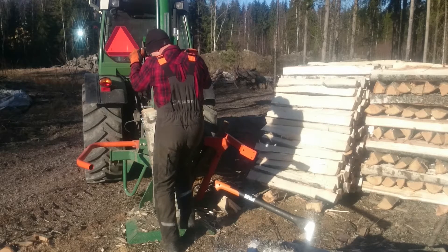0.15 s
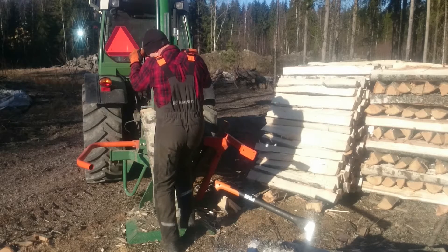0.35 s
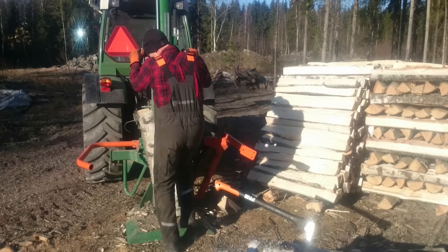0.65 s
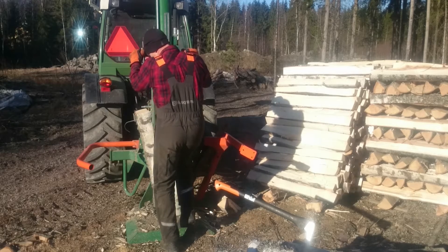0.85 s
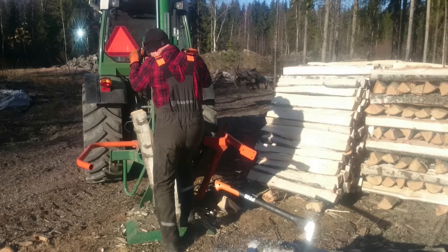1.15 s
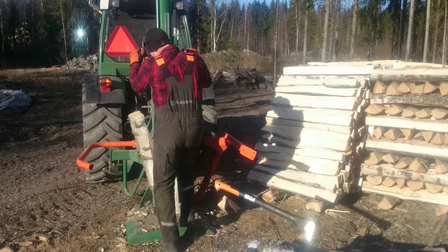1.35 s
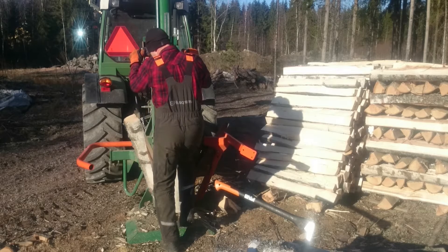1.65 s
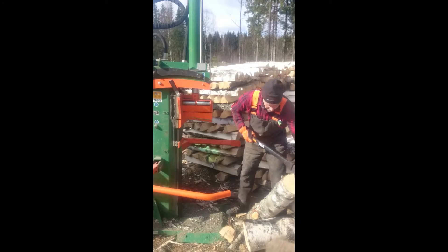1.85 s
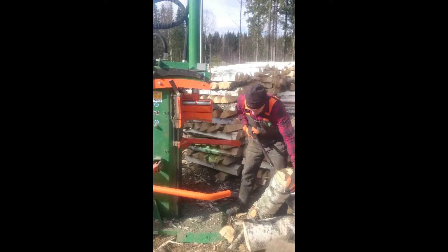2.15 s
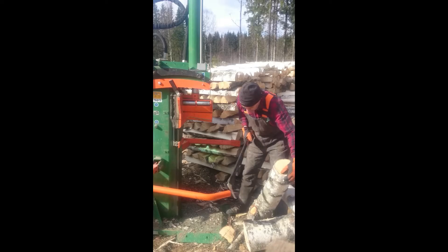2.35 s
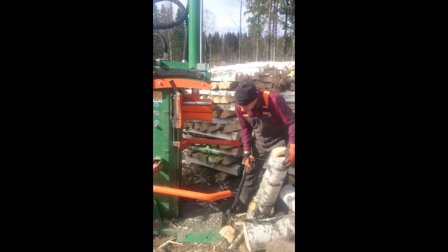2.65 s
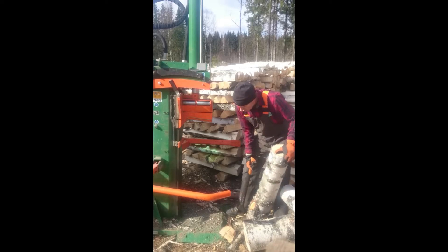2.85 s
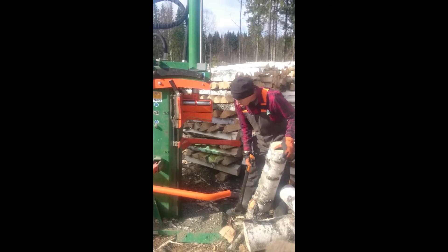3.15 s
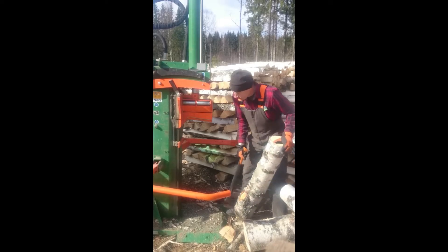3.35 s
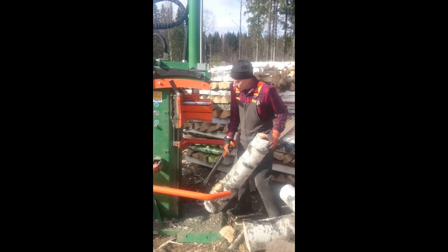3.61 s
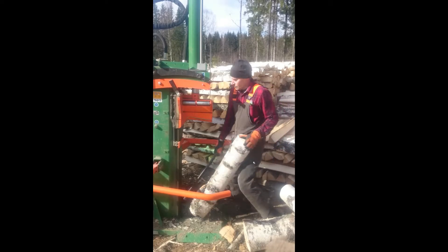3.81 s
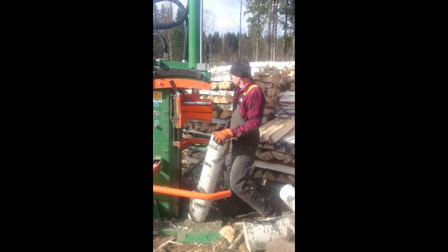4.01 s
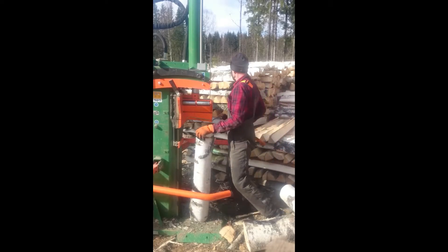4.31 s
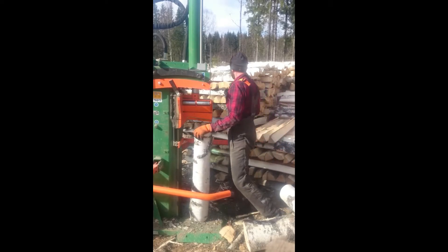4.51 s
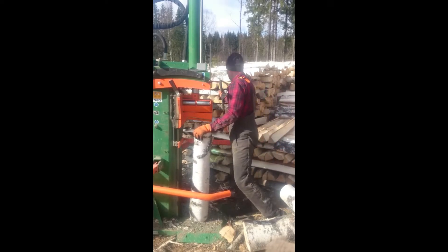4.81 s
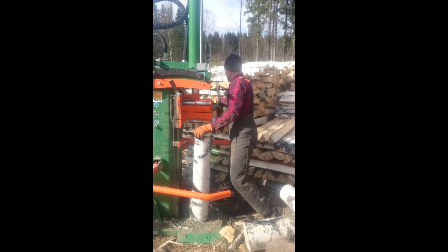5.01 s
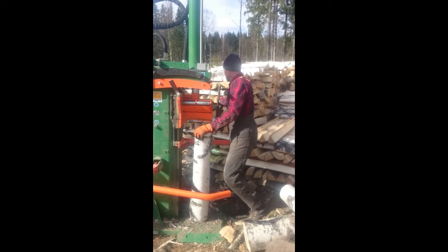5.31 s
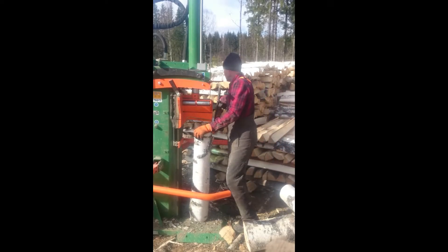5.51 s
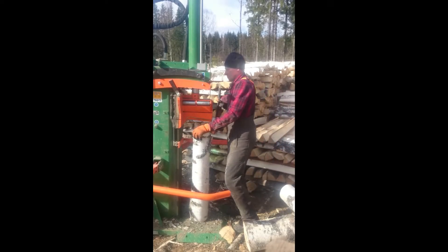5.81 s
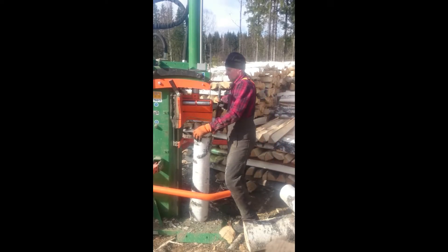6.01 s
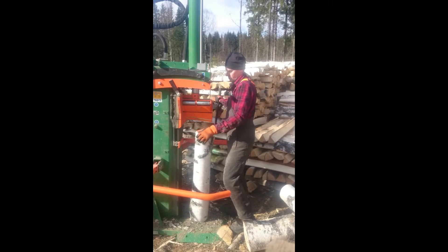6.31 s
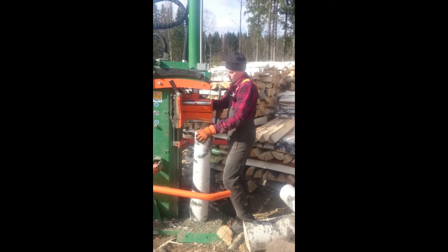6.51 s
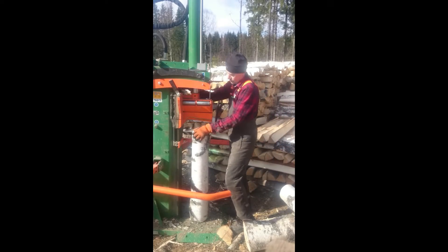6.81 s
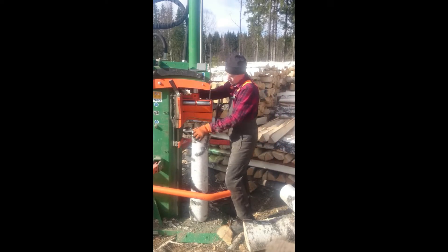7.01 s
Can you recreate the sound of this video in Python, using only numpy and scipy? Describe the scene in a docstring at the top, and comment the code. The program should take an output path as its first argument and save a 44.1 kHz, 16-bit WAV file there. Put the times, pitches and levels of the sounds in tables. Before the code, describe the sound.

Steady rapid diesel chugging runs throughout, rough and clattering. A steel clink opens; then the hydraulic splitter strains, fibres tear and the log breaks in a cluster of knocks and dry snaps. A faint descending bird whistle repeats in the lull. Metal ticks, the engine relaxes, then a second log cracks harder and splinters sparsely. Outdoors, near stereo pickup, with a light scatter from wood stacks and trees.

```python
"""A diesel tractor idles with thud, clatter and rattle; twice it labours as a log splitter's valve opens.
Oil hisses and a birch log tears apart with rips, creaks, knocks and sharp cracks; steel clinks, a bird calls.
Engine sounds follow a count of firings: pulses for the exhaust, shaped noise for the machine, a sine for the pump.
Bursts of tiny breaks excite the resonances of fibres and log; knocks and clinks are sums of dying sine modes.
Dense reflections from woodpiles and forest edge surround everything but the engine."""
import sys
import numpy as np
from scipy import signal
from scipy.fft import rfft, irfft
from scipy.io import wavfile

SR = 44100
rng = np.random.default_rng(int(sys.argv[2]) if len(sys.argv) > 2 else 0)


def inscribe(sig):
    """Save sig as 16-bit PCM at rate SR to the path in sys.argv[1].

    A 1-D sig is mono; a 2-D sig holds one channel per row.
    Samples are clipped to [-1, 1] before scaling.
    """
    pcm = np.round(np.clip(np.atleast_2d(sig).T, -1, 1) * 32767)
    wavfile.write(sys.argv[1], SR, pcm.astype(np.int16))


N = 315756
TIME = np.arange(N) / SR

# strokes of the ram: (valve opens t/s, valve closes t/s, time scale of the log's resistance/s,
# share of full pressure that pushes on through the split log/0-1)
STROKES = [(.6, 2.78, 0.47, 0.5), (4.46, 7.3, 0.092, 0.81)]
IDLE_HZ = 22.988  # firings per second
CONTACT_S = .06  # from the opening of the valve until the wedge meets the log
CLATTER_POWER = .43  # below 1: diesel knock and rattle harden already at light load


def from_db(db):
    """Decibels to gain."""
    return 10 ** (np.asarray(db) / 20)


def rms_one(x):
    """Scale to rms 1."""
    return x / np.sqrt(np.mean(x ** 2) + 1e-20)


def at_hz(points, hz):
    """Read a spectrum on a log-frequency axis."""
    point_hz, value = np.array(points).T
    return np.interp(np.log(hz), np.log(point_hz), value)


def drift(rate):
    """Smooth chance of rms 1 that takes a new direction rate times a second."""
    knots = rng.standard_normal(4096)
    return rms_one(np.interp(TIME * rate, np.arange(len(knots)), knots))


def since(s):
    """Seconds gone by since time s, zero before it."""
    return np.maximum(TIME - s, 0)


def add(track, s, sound):
    """Lay a sound into a track at time s."""
    start = max(int(s * SR), 0)
    track[..., start:start + sound.shape[-1]] += sound[..., :N - start]


def resonance(x, hz, width_hz):
    """Two-pole resonance with gain 1 on top."""
    radius = np.exp(-np.pi * width_hz / SR)
    zeros = np.array([1, 0, -1]) * (1 - radius ** 2) / 2
    poles = [1, -2 * radius * np.cos(2 * np.pi * hz / SR), radius ** 2]
    return signal.lfilter(zeros, poles, x + 1e-18)


def body(x, modes, scatter_octaves):
    """Parallel resonances, tuned a little differently for every break; white noise keeps its power."""
    click = signal.unit_impulse(SR // 20)
    detune = 2 ** (scatter_octaves * (2 * rng.random(len(modes)) - 1))
    response = np.zeros(len(click))
    for k, (hz, width, db) in enumerate(modes):
        # alternating signs avoid deep notches between neighbours
        response += (-1) ** k * from_db(db) * resonance(click, hz * detune[k], width)
    return signal.fftconvolve(x, response[None] / np.linalg.norm(response), axes=1)


def stereo_noise(spectrum):
    """Steady noise of a given colour, its two channels alike only as far as a table allows; rms 1."""
    # left-right likeness of the machine noise: (f/Hz, likeness/0-1)
    likeness = [(100, 1), (300, 0.87), (800, 0.71), (1500, 0.88), (3000, 0.48), (6000, 0.22), (12000, 0)]
    hz = np.fft.rfftfreq(N, 1 / SR) + 1e-3
    low_skirt = 1 + (spectrum[0][0] / hz) ** 4
    high_skirt = 1 + (hz / spectrum[-1][0]) ** 12
    alike = np.clip(at_hz(likeness, hz), 0, 1)
    mid, side = rfft(rng.standard_normal((2, N)))
    both = np.sqrt(1 + alike) * mid + np.sqrt(1 - alike) * side * [[1], [-1]]
    colour = from_db(at_hz(spectrum, hz)) / np.sqrt(low_skirt * high_skirt)
    return rms_one(irfft(both * colour, N))


def oil_pressure():
    """0-1: builds as the valve opens, peaks as the wedge forces the log, holds, drains as the valve closes."""
    open_s, close_s = .062, .092  # time constants of the oil pressure
    wedge_peak_s = .66  # the log resists most this long after the valve opens
    pressure = np.zeros(N)
    for opens, closes, resists_s, hold in STROKES:
        valve = (1 - np.exp(-since(opens) / open_s)) * np.exp(-since(closes) / close_s)
        wedge = np.exp(-((since(opens) - wedge_peak_s) / resists_s) ** 2)
        pressure += valve * (hold + (1 - hold) * wedge)
    return np.clip(pressure, 0, 1)


def crankshaft():
    """Running count of firings: a steady idle that sags under load at the start of each stroke, then recovers."""
    first_firing_s = .022
    sag_hz, sag_s = .4, .13  # deepest sag, in firings per second, and when it comes after the valve opens
    sag = sum(since(opens) / sag_s * np.exp(1 - since(opens) / sag_s) for opens, *_ in STROKES)
    return np.cumsum(IDLE_HZ - sag_hz * sag) / SR - first_firing_s * IDLE_HZ


def combustion_db(firings):
    """Strength of the burning: an unequal pattern over three cylinders, plus chance at the firing rate."""
    cylinder_pattern = .6 * np.cos(2 * np.pi * firings / 3)
    return cylinder_pattern + 1.0 * drift(IDLE_HZ)


def exhaust(firings):
    """One smooth pressure pulse per firing, summed from harmonics of the firing rate; rms 1."""
    # exhaust pulse: (multiple of the firing rate, relative level/dB)
    harmonics = [(1, -36), (2, 3.5), (3, 3.5), (4, -2), (5, -3), (6, -9), (7, -20), (8, -66), (9, -37),
                 (10, -27.5)]
    pulses = sum(from_db(db) * np.cos(2 * np.pi * round(multiple) * firings) for multiple, db in harmonics)
    return rms_one(pulses)


def guard_rattle(firings, pressure):
    """Each firing kicks a loose guard, whose resonances give a short, throaty rattle, harder under load."""
    # resonances of the guard: (f/Hz, width/Hz, relative level/dB)
    guard_modes = [(722, 42, -0.5), (812, 16, 2), (932, 5.4, 1)]
    kick_phase, kick_fade = .38, .35  # when it is kicked and how fast it settles, in firings
    idle_db, rise_db = -55, 16.5  # at idle; added at full pressure
    kicks = np.exp(-((firings - kick_phase) % 1) / kick_fade) * from_db(2.0 * drift(23))
    contacts = kicks * stereo_noise([(400, 0), (1500, 0)])
    ringing = np.zeros((2, N))
    for k, (hz, width, db) in enumerate(guard_modes):
        ringing += (-1) ** k * from_db(db) * resonance(contacts, hz, width)
    return from_db(idle_db + rise_db * pressure ** CLATTER_POWER) * rms_one(ringing)


def pump_hum(firings):
    """The crankshaft turns the hydraulic pump: a sine locked to the firings, wavering in level and phase."""
    level_db = -32.5 + 1.0 * drift(13)
    turns = 2 * np.pi * 8.88 * firings  # 8.88 pump cycles per firing
    return from_db(level_db) * np.sin(turns + .35 * drift(6))


def oil_hiss(pressure, throb):
    """Oil forced through the valve: bright noise that grows with pressure and bursts as the valve closes."""
    # hiss spectrum: (f/Hz, relative density level/dB)
    hiss_spectrum = [(1000, -2), (2800, 10.5), (4500, -5.5), (6000, -3), (8000, 3), (9700, -3), (10600, 3),
                     (12000, 1), (15000, -0.5)]
    idle_db, rise_db = -70, 23  # at idle; added at full pressure
    dump_db, dump_fade_s = -47, .089  # oil escapes as the valve closes
    dump = sum((TIME > closes) * np.exp(-since(closes) / dump_fade_s) for _, closes, *_ in STROKES)
    flow = from_db(idle_db + rise_db * pressure) + from_db(dump_db) * dump
    return flow * stereo_noise(hiss_spectrum) * from_db(.4 * throb + 1.1 * drift(14))


def tractor(pressure):
    """Exhaust, block, diesel clatter, guard, pump and oil: timed by the crankshaft, most swell with pressure."""
    # spectra of block rumble and diesel clatter: (f/Hz, relative density level/dB)
    rumble_spectrum = [(30, -29), (60, 4), (110, 1), (170, -3.5), (215, -6.5), (250, -2.5), (290, -12.5),
                       (350, -12), (450, -31), (900, -29)]
    clatter_spectrum = [(200, -5), (330, -3.5), (450, -1.5), (600, 0), (790, -1.5), (1000, -8),
                        (1400, -13.5), (2000, -17), (2800, -17.5), (4500, -22), (6000, -26.5),
                        (8000, -39.5), (10500, -47.5), (15000, -57)]
    # ringing panels of the tractor and splitter: (f/Hz, width/Hz, level against the clatter/dB)
    panels = [(1220, 12, 3.5), (1345, 24, 1), (1530, 11, -19), (1860, 284, -1), (4430, 240, -4)]
    # levels at idle, ahead of the modulation by each firing
    exhaust_db, rumble_db, clatter_db = -15, -29.5, -40.5
    effort_rise_db, clatter_rise_db = 2.0, 7  # added at full pressure
    dip_s, dip_length_s, dip_db = 2.7, .084, 3  # thud and rumble briefly weaker around the valve's closing

    firings = crankshaft()
    dip = np.exp(-((TIME - dip_s) / dip_length_s) ** 2)
    effort_db = effort_rise_db * pressure - dip_db * dip
    burn_db = combustion_db(firings)
    throb = np.cos(2 * np.pi * (firings - .66))  # combustion falls between the exhaust pulses
    since_tap = 3 * firings % 1  # injector and two valves per firing
    taps = np.exp(-since_tap / .095) * (1 + .5 * drift(75))

    thud = from_db(exhaust_db + effort_db) * exhaust(firings) * from_db(.17 * burn_db)
    rumble = from_db(rumble_db + effort_db) * stereo_noise(rumble_spectrum)
    rumble = rumble * from_db(2.44 * throb + .5 * burn_db)
    clatter = from_db(clatter_db + clatter_rise_db * pressure ** CLATTER_POWER) * stereo_noise(clatter_spectrum)
    clatter = clatter * from_db(.9 * throb + 1.45 * taps + burn_db)
    clatter = clatter + sum(from_db(db) * resonance(clatter, hz, width) for hz, width, db in panels)
    machine = thud + rumble + clatter + guard_rattle(firings, pressure)
    return machine + pump_hum(firings) + oil_hiss(pressure, throb)


def fractures(length_s, fade_s, per_s, spread_db, aside):
    """A run of tiny uneven breaks, each leaning to one side: about rms 1 while it lasts, then dying away."""
    t = TIME[:SR // 4]
    chance = rng.random(len(t))
    size, direction = rng.standard_normal((2, len(t)))
    breaks = (chance < per_s / SR) * from_db(spread_db * np.clip(size, -2, 2)) * rng.choice([-1, 1], len(t))
    shape = np.exp(-np.maximum(t - length_s, 0) / fade_s)
    both = breaks * shape * (1 + aside * direction * [[1], [-1]])
    return rms_one(both) * np.sqrt(np.mean(shape ** 2))


def clinks(focus_octaves, scrape_db):
    """Each touch scrapes briefly and rings the steel modes, most strongly those near one pitch."""
    # steel touches: (t/s, level/dB, pitch that rings most f/Hz)
    touches = [(0.047, -28.5, 11050), (.643, -43, 5200), (0.657, -47, 9600), (2.671, -39, 7900),
               (2.69, -32, 5060), (2.702, -34, 9600), (4.459, -38.5, 8100), (4.464, -38, 5200),
               (5.337, -32.5, 9800), (5.353, -40, 9700), (5.374, -42, 9900), (6.685, -51, 9550)]
    # steel modes: (f/Hz, relative level/dB, t60/s)
    steel_modes = [(5215, 11, 0.031), (8170, 0.5, 0.14), (9500, -1, 0.1), (10080, -2.5, 0.07),
                   (10600, -12, .06), (12100, -11, .07)]
    out, t = np.zeros((2, N)), TIME[:SR // 4]
    for s, db, main_hz in touches:
        scrape = fractures(length_s=.0085, fade_s=.015, per_s=7200, spread_db=6, aside=.98)
        add(out, s, from_db(db + scrape_db) * resonance(scrape, 5800, 6600))
        for hz, mode_db, t60 in steel_modes:
            share = 1 / (1 + (np.log2(hz / main_hz) / focus_octaves) ** 2)
            ring = np.sin(2 * np.pi * (hz * t + rng.random())) * from_db(db + mode_db - 60 * t / t60)
            add(out, s, share * ring * (1 - np.exp(-t / .0015)))
    return out * from_db(2.3 * drift(500))  # loose parts chatter as they ring


def small_breaks(pressure, start, end, count):
    """Unevenly spaced breaks of random size, louder under more pressure: (t/s, relative level/dB)."""
    spread_db, slack_loss_db = 4, 16  # the loss applies without pressure
    when, size = rng.random((count, 2)).T
    s = start + (end - start) * (np.arange(count) + when) / count
    slack = 1 - np.interp(s, TIME, pressure)
    return zip(s, spread_db * (2 * size - 1) - slack_loss_db * slack)


def frays(pressure):
    """Faint rips while the wedge goes in: (t/s, length/s, snapping/dB, log body/dB, treble/dB)."""
    end_s, length_s = 1.05, .032  # last possible start after the valve opens; length of a rip
    snap_db, body_db = -43.5, -41.5  # at full pressure, ahead of the random size
    rows = []
    for opens, *_ in STROKES:
        for s, db in small_breaks(pressure, opens + CONTACT_S, opens + end_s, count=14):
            rows.append((s, length_s, snap_db + db, body_db + db, 0))
    return rows


def splinters(pressure):
    """Small cracks along each stroke: (t/s, level/dB, body and ring relative to it/dB, ring f/Hz)."""
    crack_db = -42.5  # at full pressure, ahead of the random size
    body_db, ring_db, ring_hz = -3, -5, 4500
    rows = []
    for opens, closes, *_ in STROKES:
        for s, db in small_breaks(pressure, opens + CONTACT_S, min(closes, TIME[-1]), count=12):
            rows.append((s, crack_db + db, body_db, ring_db, ring_hz))
    return rows


def fibres(x, scatter_octaves):
    """The bright voice of snapping fibres, too thin to radiate much bass."""
    # fibre resonances: (f/Hz, width/Hz, relative level/dB)
    fibre_modes = [(3230, 1030, 0.5), (4900, 1570, 2.5), (6060, 3020, -3), (9900, 2700, -7),
                   (13300, 15000, -13.5)]
    bass_cut = signal.butter(2, 1100, "high", fs=SR, output="sos")
    return signal.sosfilt(bass_cut, body(x, fibre_modes, scatter_octaves))


def treble(x, db):
    """Raise or lower the range above about 7 kHz."""
    low = signal.sosfilt(signal.butter(1, 7000, fs=SR, output="sos"), x)
    return low + from_db(db) * (x - low)


def splitting_log(pressure):
    """Rips and millisecond cracks excite fibres and log; each crack leaves a splinter ringing in two modes."""
    # rips of the fibres, brief or drawn out:
    # (t/s, length/s, snapping level/dB, log body level/dB, treble shelf/dB)
    rip_rows = [(.624, 0.098, -43.5, -38, -15), (.682, 0.016, -29, -29.5, -26),
                (.757, 0.038, -32.5, -28.5, -21), (.832, 0.039, -35.5, -30.5, 2.5),
                (.873, 0.074, -27.5, -24.5, 1), (.917, 0.063, -29, -23, -2), (1.036, 0.015, -34, -21, 5),
                (1.076, 0.0082, -23.5, -20.5, 5.5), (1.275, 0.069, -46, -45, 10),
                (1.356, 0.057, -52, -55, 15.5), (1.491, 0.031, -46.5, -45, 11.5),
                (1.592, 0.041, -46, -34.5, 9), (1.652, 0.046, -45.5, -56, 0),
                (2.568, 0.033, -44, -33.5, -14), (2.669, 0.036, -40, -32.5, 8),
                (2.7, 0.063, -40.5, -29.5, 0.5), (2.765, 0.044, -45, -40, 6),
                (4.445, 0.083, -40.5, -35.5, -19), (4.561, 0.042, -30.5, -27, -23),
                (4.59, 0.07, -32, -28, -18), (4.66, 0.062, -27, -25, 1), (4.698, 0.077, -28, -25.5, 2),
                (4.786, 0.019, -31.5, -36, 2), (5.06, 0.022, -32, -36, 5), (5.085, 0.066, -38, -41, 4.5),
                (5.337, 0.026, -33, -32, 6.5), (5.356, 0.029, -28.5, -29, 3.5),
                (6.43, 0.015, -51.5, -51, 11.5), (7.02, 0.027, -51.5, -52, 17)]
    # cracks: (t/s, level/dB, log body relative to it ahead of a 6 dB lift/dB,
    # splinter ring relative to it/dB, ring f/Hz)
    crack_rows = [(.876, -34, 7, -6, 4440), (.943, -29.5, 1, -5, 4600), (1.0189, -28, 2, 7, 4130),
                  (1.0755, -22, -7, 1, 4300), (1.1742, -22.5, -12, 4, 4640), (1.1944, -26.5, -5, -16, 4400),
                  (1.2466, -27, -1.5, -2, 3800), (1.2626, -28, -2, -10, 4600),
                  (1.3199, -28.5, -13, 1, 4260), (1.3573, -28.5, -16, -4, 5160),
                  (1.3962, -39, -23, -8, 4400), (4.5625, -39, -3, 11, 4500), (4.6585, -23, -5, 6, 5270),
                  (4.6784, -26, -4, 3, 4270), (4.7005, -31, 4, 1, 4840), (4.7299, -25, 3.5, 7, 4530),
                  (4.7845, -21, -1, 0, 4300), (4.8574, -21.5, -7, 7, 4600), (4.8975, -24.5, -5, -8, 4300),
                  (5.0397, -19, -6, 3.5, 4670), (5.0572, -18, -9, -11, 4970),
                  (5.0878, -24.5, -5.5, 7, 5840), (5.1716, -28.5, -16, -4, 3520),
                  (5.2845, -28, -6, 2, 4800), (5.2962, -16.5, -15, -2, 4600), (5.361, -30, 1, -2, 4450),
                  (5.7876, -39.5, -2, 13, 3630), (5.993, -35, -19, 2, 4600), (6.0248, -38, 1, 14, 4170),
                  (6.054, -35, 2, -4, 5200), (6.5627, -30, -5, -6, 3550), (7.0177, -35.5, -20, -16, 4700)]
    # resonances of the log: (f/Hz, width/Hz, relative level/dB)
    log_modes = [(327, 210, -4), (540, 350, 2.5), (743, 202, 7), (1080, 264, 2), (1430, 267, 2.5),
                 (1720, 325, 0.5), (2340, 900, -6.5)]
    attack_s, loss_db = .0011, 5.5  # a rip takes hold quickly and weakens by this much along its length
    splinter_t60_s, low_ratio, low_db = .008, .715, -4.5  # lower mode relative to the main one
    rips, cracks, t = np.zeros((2, N)), np.zeros((2, N)), TIME[:SR // 4]

    for s, length, snap_db, body_db, treble_db in list(rip_rows) + frays(pressure):
        shape = (1 - np.exp(-t / attack_s)) * from_db(-loss_db * np.minimum(t / length, 1))
        snaps = fractures(length, fade_s=.0083, per_s=3500, spread_db=4.5, aside=.67)
        thumps = fractures(length, fade_s=.0041, per_s=1600, spread_db=2.5, aside=.2)
        bright = fibres(from_db(snap_db) * shape * snaps, scatter_octaves=.08)
        woody = body(from_db(body_db) * shape * thumps, log_modes, scatter_octaves=.074)
        add(rips, s, treble(bright, treble_db) + woody)

    for s, db, body_db, ring_db, ring_hz in list(crack_rows) + splinters(pressure):
        crack = from_db(db) * fractures(length_s=.0012, fade_s=.0015, per_s=17000, spread_db=2.5, aside=.51)
        turn = 2 * np.pi * ring_hz * t
        ring = np.sin(turn) + from_db(low_db) * np.sin(low_ratio * turn)
        add(cracks, s, from_db(db + ring_db - 60 * t / splinter_t60_s) * ring)
        woody = from_db(body_db + 6.0) * body(crack, log_modes, scatter_octaves=.11)
        add(cracks, s, fibres(crack, scatter_octaves=.16) + woody)
    return cracks + rips * from_db(1.25 * drift(160))  # fibres let go in bundles


def creaks():
    """Wood sticks and slips on the steel wedge: a short, unsteady tone that swells and fades."""
    # creaks: (t/s, length/s, peak level/dB, pitch f/Hz)
    creak_rows = [(0.754, .045, -29.5, 820), (0.954, .034, -31, 1560), (2.54, .034, -36, 1580),
                  (4.582, .022, -31, 1440), (4.711, .034, -23, 1420)]
    waver = 1 + .018 * drift(200)  # share by which the pitch wavers
    turns = 2 * np.pi * np.cumsum(waver) / SR
    out = np.zeros(N)
    for s, length, db, hz in creak_rows:
        swell = np.sin(np.pi * np.minimum(since(s) / length, 1))
        out += from_db(db) * swell * np.sin(hz * turns)
    return out * from_db(2 * drift(250))


def knocks():
    """Knocks on wedge and foot plate ring the log's modes, mostly near a pitch set by where it is struck."""
    # knocks: (t/s, level/dB, pitch that rings most f/Hz)
    strikes = [(.877, -15, 615), (.892, -16, 312), (.902, -17, 480), (.929, -26, 800), (.941, -22, 780),
               (1.027, -22, 700), (1.04, -19, 1150), (1.076, -18.5, 950), (1.175, -23.5, 1580),
               (1.262, -27, 1200), (4.571, -24, 950), (4.584, -29, 720), (4.658, -21, 900),
               (4.678, -23, 303), (4.698, -27, 800), (4.717, -25, 600), (4.73, -20.5, 700),
               (4.7838, -19, 1420), (4.861, -23, 1580), (4.8967, -28, 1490), (5.039, -17, 840),
               (5.058, -23.5, 800), (5.088, -31, 1420), (5.113, -33, 700), (5.361, -36, 1060),
               (6.023, -29, 680)]
    # modes of the log: (f/Hz, relative level/dB, t60/s)
    wood_modes = [(304, 2.5, 0.085), (430, 0, 0.074), (584, -4.5, 0.069), (730, -2, 0.073),
                  (893, -1, 0.067), (1055, -2, 0.093), (1210, -6, 0.057), (1403, -0.5, 0.052),
                  (1544, 0, 0.045), (1690, -6, .05)]
    focus_octaves, contact_s = .48, .00025  # spread of the modes one knock wakes; rise time
    scatter_octaves, spread_db = .05, 2.5  # modes shift as the log opens and share each force differently
    out, t = np.zeros(N), TIME[:SR // 4]
    hz, mode_db, t60 = np.transpose(wood_modes)[..., None]
    for s, db, main_hz in strikes:
        phase, luck, shift = rng.random((3, len(wood_modes), 1))
        pitch = hz * 2 ** (scatter_octaves * (2 * shift - 1))
        focus = 1 / (1 + (np.log2(hz / main_hz) / focus_octaves) ** 2)
        share = focus * from_db(mode_db + spread_db * (2 * luck - 1))
        share = share / np.linalg.norm(share)
        modes = share * np.sin(2 * np.pi * (pitch * t + phase)) * from_db(-60 * t / t60)
        add(out, s, from_db(db) * modes.sum(axis=0) * (1 - np.exp(-t / contact_s)))
    return out


def bird(count):
    """A fading run of thin sine whistles, each gliding down ever faster."""
    start_s, gap_s, note_s = 1.892, .073, .038  # gap from one start to the next
    high_hz, low_hz, first_db, loss_db = 7100, 6000, -48, 6  # loss from each note to the next
    out, u = np.zeros(N), np.linspace(0, 1, int(note_s * SR))
    hz = high_hz + (low_hz - high_hz) * u ** 1.6
    note = np.sin(np.pi * u) * np.sin(2 * np.pi * np.cumsum(hz) / SR)
    for k in range(count):
        add(out, start_s + k * gap_s, from_db(first_db - k * loss_db) * note)
    return out


def scatter(x, t60, delay_s, cut_hz):
    """Dense dying reflections, different in each channel; white noise keeps its power."""
    t = TIME[:SR]
    tail = rng.standard_normal((2, SR)) * from_db(-60 * t / t60) * (t > delay_s)
    tail = signal.sosfilt(signal.butter(1, cut_hz, fs=SR, output="sos"), tail)
    return signal.fftconvolve(x[None], tail / np.linalg.norm(tail, axis=1, keepdims=True), axes=1)[:, :N]


def scene():
    """Oil pressure loads the engine and breaks the log; all but the engine scatters off woodpiles and forest."""
    pressure = oil_pressure()
    engine = tractor(pressure)
    direct = clinks(focus_octaves=.087, scrape_db=-7.5) + splitting_log(pressure)
    direct = direct + creaks() + knocks() + bird(count=4)
    middle = direct.mean(axis=0)
    woodpiles = from_db(-4.5) * scatter(middle, t60=.06, delay_s=.00357, cut_hz=21000)
    forest = from_db(-13.0) * scatter(middle, t60=.37, delay_s=.024, cut_hz=21050)
    return direct + woodpiles + forest + engine


def record(dry):
    """The left loses bass and rings at two treble resonances, the right lags; both ends of the range are cut."""
    right_lag_s = .000099
    left, right = dry
    left = signal.sosfilt(signal.butter(1, 75, "high", fs=SR, output="sos"), left) * from_db(-1.5)
    left = left + 2.37 * resonance(left, 4715, 1510) + 2.0 * resonance(left, 10010, 1300)
    lag = np.exp(-2j * np.pi * np.fft.rfftfreq(N, 1 / SR) * right_lag_s)
    right = irfft(rfft(right) * lag, N)
    both = signal.sosfilt(signal.butter(4, 45, "high", fs=SR, output="sos"), [left, right])
    return signal.sosfilt(signal.ellip(10, .2, 80, 15900, fs=SR, output="sos"), both)


dry = scene()
out = record(dry)
inscribe(out)
```